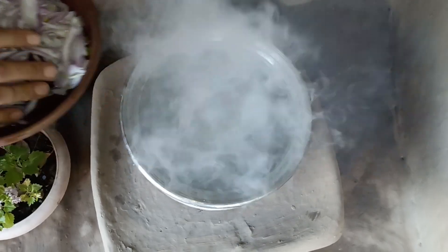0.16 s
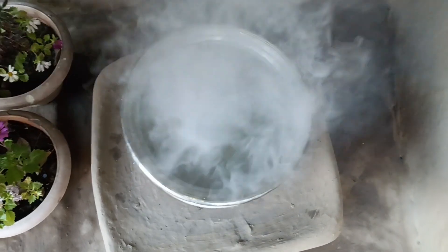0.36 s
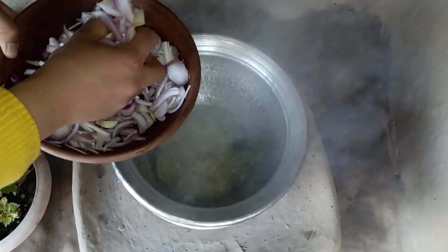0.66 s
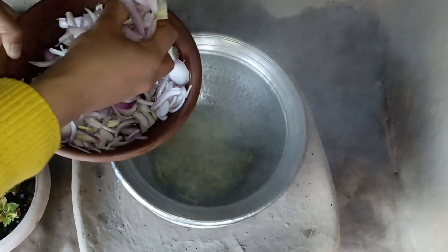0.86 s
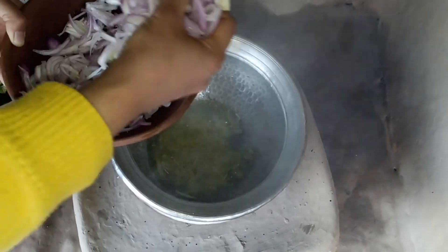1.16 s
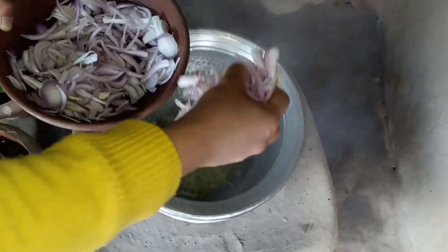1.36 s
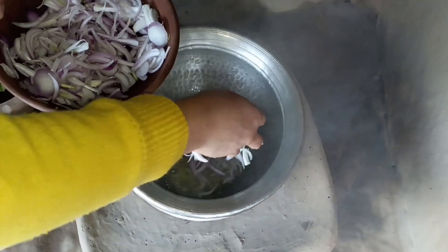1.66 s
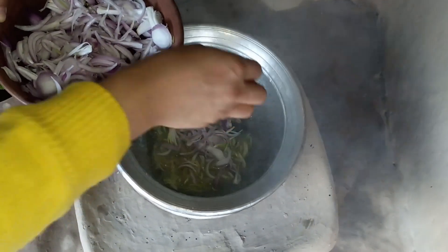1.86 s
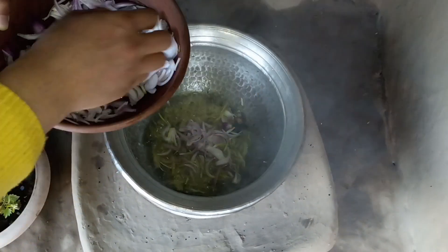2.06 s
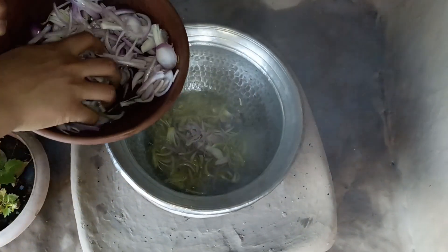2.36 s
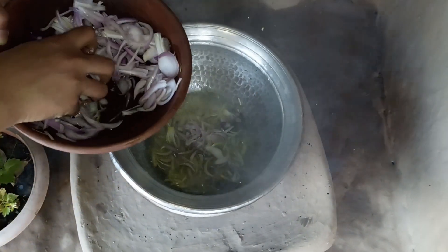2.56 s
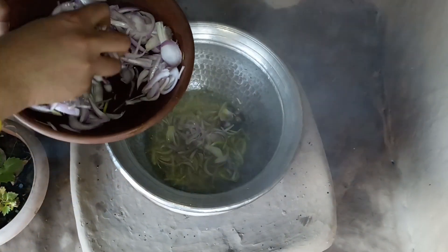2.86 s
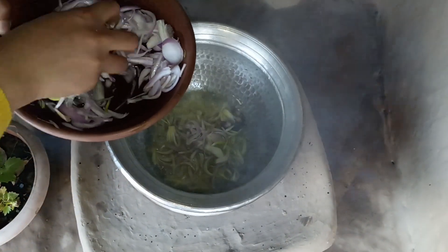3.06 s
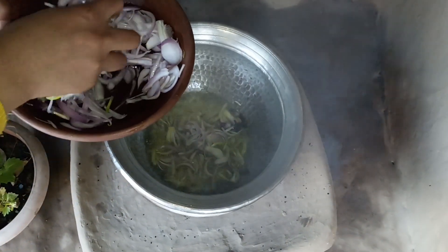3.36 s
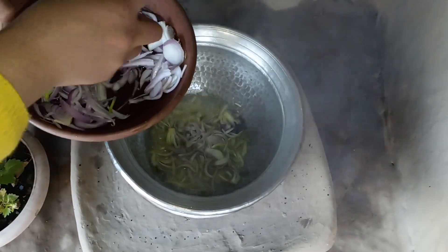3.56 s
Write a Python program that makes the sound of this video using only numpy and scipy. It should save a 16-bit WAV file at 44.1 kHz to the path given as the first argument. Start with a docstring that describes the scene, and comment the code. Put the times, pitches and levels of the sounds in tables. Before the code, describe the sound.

Hot oil sizzles in a metal pot, eases, then swells again when sliced onions land.

```python
"""Sliced onions fry in a deep metal pot, the microphone close by, almost all on the right channel. At first
water flashing to steam in the hot oil sizzles fiercely, tiny bursts and bubbles ringing the pot. At 0.5 s the
sizzle drops abruptly; droplets tick and spit, and a motor drones far away. Near 1.7 s a fresh handful thuds in,
flares up with spurts of steam and slowly calms. Around 3 s a hand gathers wet slices and bumps the bowl, while
the distant motor labours."""
import sys
import numpy as np
from scipy import signal
from scipy.fft import rfft, irfft, next_fast_len
from scipy.io import wavfile
from scipy.ndimage import uniform_filter1d

SR = 44100
rng = np.random.default_rng(int(sys.argv[2]) if len(sys.argv) > 2 else 0)


def unload_audio(sound):
    """Save the sound as a 16-bit wav file, at the path given as the first command line argument."""
    columns = np.transpose(np.atleast_2d(sound))
    # keep every value between -1 and 1, then stretch to whole-number steps
    steps = np.round(np.clip(columns, -1, 1) * 32767)
    wavfile.write(sys.argv[1], SR, steps.astype(np.int16))


N = 163170
T = np.arange(N) / SR

# strength of the frying: t/s, crackle level/dB, steam hiss level/dB, fine fizz level/dB
FRYING = [(0, -23, -28.5, -27.5), (.13, -23, -27.5, -29.5), (.24, -24.5, -26, -27),
          (.37, -23.5, -28.5, -28.5), (.477, -25.5, -30, -30.5), (.497, -34, -40, -41.5),
          (.72, -32.5, -40, -41), (.92, -34.5, -41.5, -42.5), (1.22, -34, -40.5, -41.5),
          (1.28, -35, -43.5, -44.5), (1.65, -36.5, -44.5, -46), (1.74, -32, -35.5, -34.5),
          (1.86, -26.5, -30, -31), (2.07, -24.5, -30, -31.5), (2.28, -28, -33, -32),
          (2.66, -28, -33.5, -34), (2.76, -30, -35, -35.5), (3.1, -31, -36, -38), (3.6, -31.5, -38.5, -39)]
# spectrum of bursts in the oil: f/Hz, level/dB
CRACKLE_COLOUR = [(790, -15), (900, -8), (1080, -11), (1170, -4.5), (1400, -9), (1760, -8), (1880, -1.5),
                  (2400, -2.5), (2900, 0), (3450, 0), (3750, -5), (4200, -3.5), (4750, -12)]


def undb(db):
    return 10 ** (np.asarray(db) / 20)


def unit(x):
    """Scale to rms 1."""
    return x / np.sqrt(np.mean(x ** 2))


def curve(table, column=1):
    """Gain over time from a dB column."""
    table = np.array(table)
    return undb(np.interp(T, table[:, 0], table[:, column]))


def walk(rate_hz):
    """Smooth random wandering, spread 1."""
    path = np.interp(T * rate_hz, np.arange(1000), rng.standard_normal(1000))
    return unit(uniform_filter1d(path, int(SR / rate_hz / 2)))


def colour(x, points, skirt_db=0):
    """Causal filter through (f/Hz, level/dB) points, falling by skirt_db per octave outside them."""
    hz, db = np.array(points, float).T
    size = 2 * next_fast_len(N // 2 + 4096)
    octave = np.log2(np.maximum(np.arange(size // 2 + 1) * SR / size, 1))
    knots = np.log2(hz)
    outside = np.abs(octave - np.clip(octave, knots[0], knots[-1]))
    gain = undb(np.interp(octave, knots, db) - np.minimum(skirt_db * outside, 70))
    cepstrum = irfft(np.log(gain))
    cepstrum[1:size // 2] *= 2  # fold to minimum phase
    cepstrum[size // 2 + 1:] = 0
    return irfft(rfft(x, size) * np.exp(rfft(cepstrum)))[:N]


def bursts(per_s, spread_db):
    """Random clicks, many small and a few large."""
    fires = rng.random(N) < per_s / SR
    size = np.minimum(rng.exponential(size=N), 6)
    sign = rng.choice([-1, 1], N)
    return unit(fires * sign * undb(spread_db * size))


def puffs(events, decay_s):
    """Noise that starts sharply at each (t/s, level/dB) event and dies away."""
    envelope = sum(undb(db) * (T >= s) * np.exp(-np.abs(T - s) / decay_s) for s, db in events)
    return envelope * rng.standard_normal(N)


def room(x, spots=8, decay_s=0.019, wet_db=-2):
    """Sound comes from ever-changing spots, each with its own short tail off pot walls and kitchen."""
    t = T[:6000]
    shares = np.array([walk(120) for _ in range(spots)])
    shares /= np.sqrt(np.sum(shares ** 2, axis=0))
    tails = rng.standard_normal((spots, len(t))) * np.exp(-t / decay_s) * (t > .001)
    wet = sum(signal.fftconvolve(x * share, tail / np.linalg.norm(tail))[:N]
              for share, tail in zip(shares, tails))
    return (x + undb(wet_db) * wet) / np.hypot(1, undb(wet_db))


def pot_ring(x, lands_s=1.61, settles_s=0.16):
    """The pot and the air in it add their modes; fresh slices drive them differently."""
    # f/Hz, width/Hz, level/dB before the handful lands, level/dB after
    modes = [(390, 28, -5, -2), (538, 36, -0.5, -1), (1150, 57, -3, 3), (1274, 47, 1, -27),
             (1912, 15, -5, -6), (2180, 22, -13, -7), (2620, 35, -4, 0.5), (2852, 20, 2, -3),
             (3407, 70, -9, -18)]
    landed = np.clip((T - lands_s) / settles_s, 0, 1)
    out = x
    for hz, width, before, after in modes:
        motion = signal.lfilter(*signal.iirpeak(hz, hz / width, SR), x)
        radiated = np.diff(motion, prepend=0) * SR / (2 * np.pi * hz)
        out = out + undb(before + landed * (after - before)) * radiated
    return out


def motor(turn_hz=26.1, waver=0.0124, labour_s=2.99, labour_width_s=0.85):
    """Far off, a motor drones unevenly over a low rumble; its upper orders swell as it labours."""
    level = [(0, -67), (.45, -49.5), (1.8, -48), (2.45, -44), (3.05, -43), (3.7, -50.5)]  # drone: t/s, level/dB
    orders = [(3, -3, -7.5), (4, -3.5, -3), (5, -16, 5.5), (6, -13.5, 9), (7, -12, 9), (8, -11.5, 12)]  # multiple of turn_hz, level/dB, change/dB as it labours
    phase = 2 * np.pi * np.cumsum(turn_hz * (1 + waver * walk(5))) / SR
    labour = np.exp(-((T - labour_s) / labour_width_s) ** 2)
    drone = np.zeros(N)
    for order, db, change in orders:
        flicker_db = 2.5 * walk(rate_hz=22)
        tone = np.sin(order * phase + 2 * np.pi * rng.random())
        drone += undb(db + change * labour + flicker_db) * tone
    spectrum = [(25, -26), (55, -9), (85, -1.5), (200, 0), (300, -2), (600, -16)]  # f/Hz, level/dB
    rumble = unit(colour(rng.standard_normal(N), spectrum, skirt_db=17))
    return drone * curve(level) + undb(-52) * rumble


def rustles():
    """In the bowl, wet slices crunch and slide as the hand gathers them."""
    grabs = [(2.805, 0.056, -30.5), (2.957, 0.12, -31), (3.098, 0.072, -35)]  # t/s, length/s, level/dB
    spectrum = [(600, -12.5), (1500, -5), (2200, 4.5), (3000, -5), (5000, -8.5)]  # f/Hz, level/dB
    grip = sum(undb(db) * np.sin(np.pi * np.clip((T - s) / length, 0, 1)) for s, length, db in grabs)
    crunch = room(bursts(per_s=1500, spread_db=3.3))
    return grip * unit(colour(crunch, spectrum, skirt_db=13))


def bowl_bumps():
    """The fingers dig through the slices and bump the bowl: a dull, quick clack."""
    hits = [(2.969, -12), (2.983, -23)]  # t/s, level/dB
    spectrum = [(180, -9), (400, -3), (580, 0), (800, -12), (1200, 0), (1600, -6), (2200, 1), (3300, -1),
                (4500, -9), (7000, -15)]  # f/Hz, level/dB
    return colour(puffs(hits, decay_s=0.011), spectrum, skirt_db=18)


def slice_thuds():
    """Wet slices thud softly against the bottom of the pot."""
    landings = [(1.668, -32.5), (1.695, -35)]  # t/s, level/dB
    spectrum = [(200, 4), (350, 13.5), (800, -2), (1300, 1), (2500, -3)]  # f/Hz, level/dB
    return pot_ring(colour(puffs(landings, decay_s=0.037), spectrum, skirt_db=12))


def droplet_ticks():
    """Single droplets snap on the hot metal."""
    snaps = [(1.057, -26), (1.112, -26), (1.19, -28), (1.228, -25.5), (1.893, -18)]  # t/s, level/dB
    spectrum = [(3000, 3), (6500, 2), (10000, -7), (14500, 4.5)]  # f/Hz, level/dB
    return colour(puffs(snaps, decay_s=0.0014), spectrum, skirt_db=28)


def steam_spurts():
    """Pockets of steam escape from under the slices with a brief bright hiss."""
    escapes = [(2.135, -25), (3.085, -28), (3.625, -26.5)]  # t/s, level/dB
    spectrum = [(5500, 6.5), (10000, -8), (15000, -3)]  # f/Hz, level/dB
    return colour(puffs(escapes, decay_s=0.022), spectrum, skirt_db=21)


def oil_spits():
    """Larger drops burst in a short spray that rings the pot."""
    drops = [(1.339, -21.5), (1.541, -24.5), (1.951, -25), (2.04, -19), (2.352, -18), (3.628, -26),
             (3.692, -17)]  # t/s, level/dB
    return pot_ring(colour(puffs(drops, decay_s=0.012), CRACKLE_COLOUR, skirt_db=20))


def low_bubbling():
    """Bubbling under the slices sounds the low modes of the pot."""
    level = [(0, -36), (.47, -36.5), (.5, -49), (1.37, -48.5), (1.65, -51), (1.68, -44.5), (2.5, -41.5),
             (3.7, -46.5)]  # t/s, level/dB
    spectrum = [(255, -13), (325, -1.5), (365, -3.5), (415, -1), (545, -3), (640, -8.5), (780, -18.5)]  # f/Hz, level/dB
    pops = room(bursts(per_s=1400, spread_db=3))
    return unit(pot_ring(colour(pops, spectrum, skirt_db=26.5))) * curve(level)


def bubble_pings(per_s=200, centre_hz=2980, spread_octaves=0.28, decay_cycles=6.1):
    """Small bubbles open at the surface, each a short ping."""
    out, t = np.zeros(N + 1024), T[:1024]
    for when, pitch, size in rng.random((int(per_s * N / SR), 3)):
        octaves = spread_octaves * np.log((pitch + .02) / (1.02 - pitch)) / 2
        hz = centre_hz * 2 ** octaves
        ping = np.sin(2 * np.pi * hz * t) * np.exp(-t * hz / decay_cycles)
        start = int(when * N)
        out[start:start + 1024] += (size + 0.047) ** -.45 * ping
    return unit(out[:N])


def fine_fizz():
    """The densest tiny bursts make a fizz at the very top."""
    spectrum = [(6900, -7.5), (7600, -3.5), (9000, -7.5), (11400, -8.5), (11800, -4), (13000, -5.5),
                (15000, 1.5), (16200, -2.5)]  # f/Hz, level/dB
    pops = room(bursts(per_s=12000, spread_db=3))
    return unit(colour(pops, spectrum, skirt_db=55)) * curve(FRYING, column=3)


def steam_hiss():
    """Tiny bursts of steam merge into a hiss."""
    spectrum = [(4400, -5), (4750, -4), (5400, 0.5), (6800, 0.5), (7050, -6.5)]  # f/Hz, level/dB
    pops = room(bursts(per_s=7300, spread_db=3))
    return unit(colour(pops, spectrum, skirt_db=34.5)) * curve(FRYING, column=2)


def oil_crackle(ping_db=-11):
    """Steam bursts and quieter bubble pings ring the pot."""
    pops = room(bursts(per_s=6500, spread_db=2.5))
    ringing = unit(pot_ring(colour(pops, CRACKLE_COLOUR, skirt_db=23.5)))
    pings = unit(pot_ring(room(bubble_pings())))
    return unit(ringing + undb(ping_db) * pings) * curve(FRYING)


def frying(sputter_db=0.43, swell_db=0.7):
    """Close to the microphone, water flashes to steam in the oil; all the layers sputter together."""
    sputter = undb(sputter_db * walk(rate_hz=36.36))
    crackle = oil_crackle()
    treble = fine_fizz() + steam_hiss()
    bubbling = low_bubbling()
    swell = undb(swell_db * walk(rate_hz=11))
    return sputter * (crackle + swell * treble + bubbling)


def scene():
    """Everything reaches the right channel; the left gets only a faint dull leak and hiss."""
    leak = [(30, -38), (75, -23.5), (220, -27), (500, -32), (3000, -47.5), (6000, -55), (15000, -52)]  # filter on the left channel: f/Hz, level/dB
    hiss_colour = [(100, -2.5), (600, -3), (3000, 3), (7000, -2.5), (15000, -5.5)]  # f/Hz, level/dB
    sizzle = frying() + oil_spits() + steam_spurts() + droplet_ticks()
    right = 2 * (sizzle + rustles() + bowl_bumps() + slice_thuds() + motor())
    hiss = np.std(right) * unit(colour(rng.standard_normal(N), hiss_colour))
    left = colour(undb(-3.5) * right + undb(-1) * hiss, leak)
    return np.array([left, right])


def record(dry):
    """The recorder cuts the top steeply above 15750 Hz."""
    return signal.sosfilt(signal.ellip(12, .2, 80, 15750, fs=SR, output="sos"), dry)


dry = scene()
out = record(dry)
unload_audio(out)
```